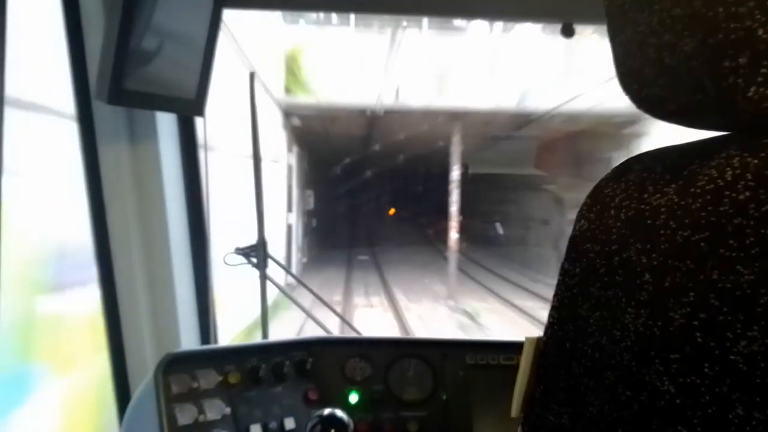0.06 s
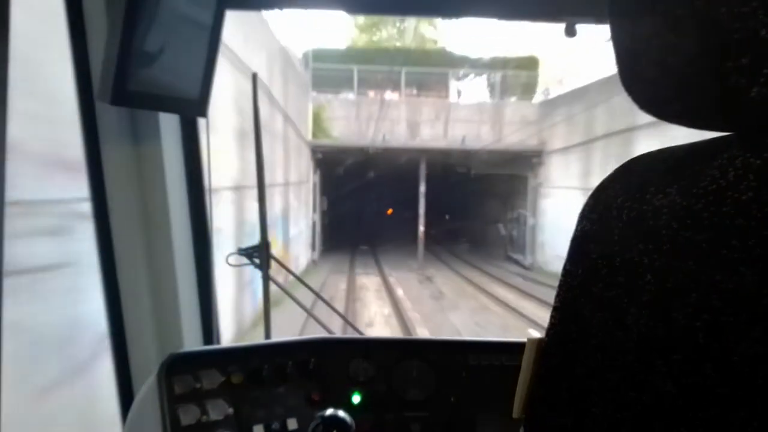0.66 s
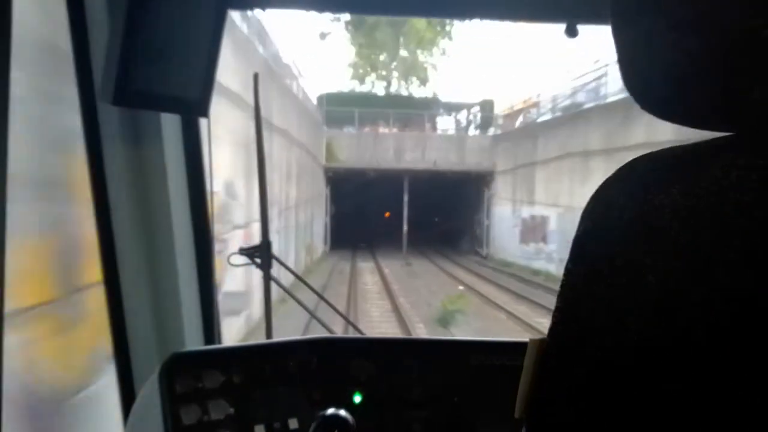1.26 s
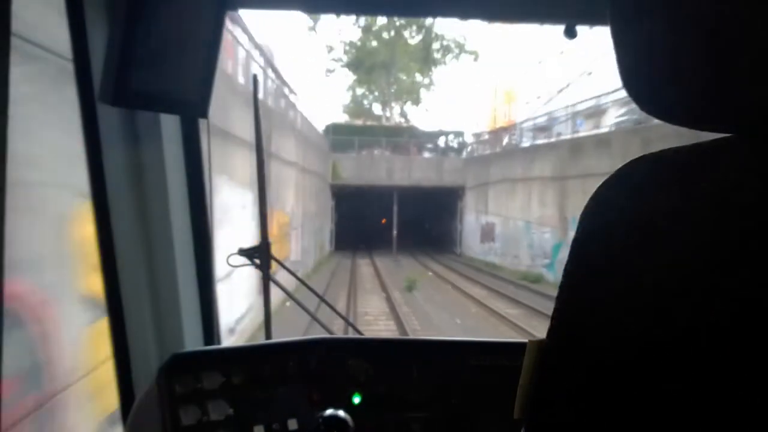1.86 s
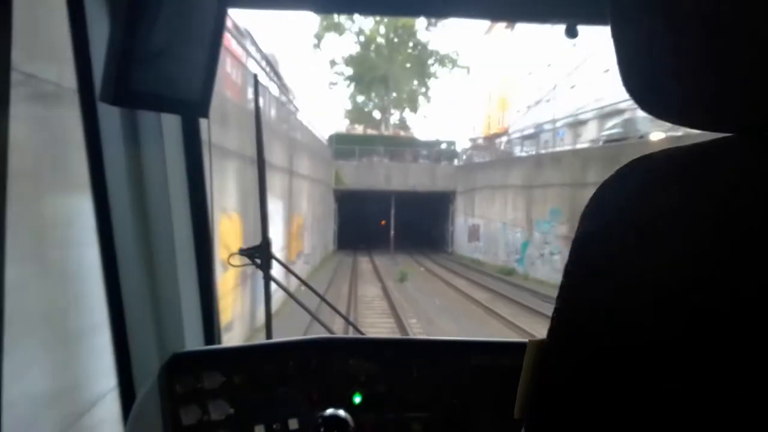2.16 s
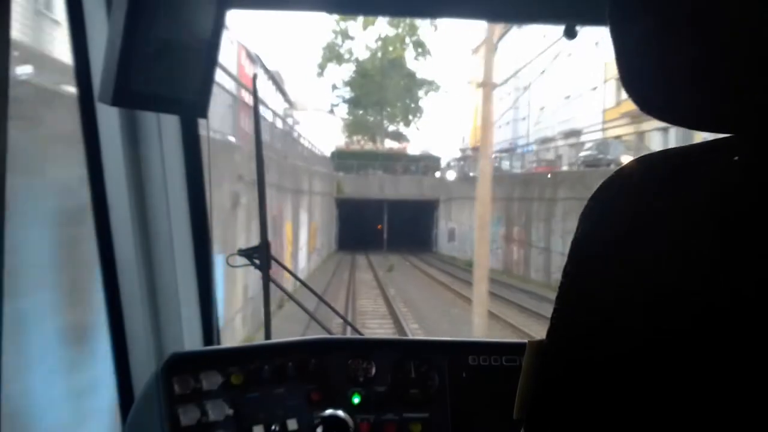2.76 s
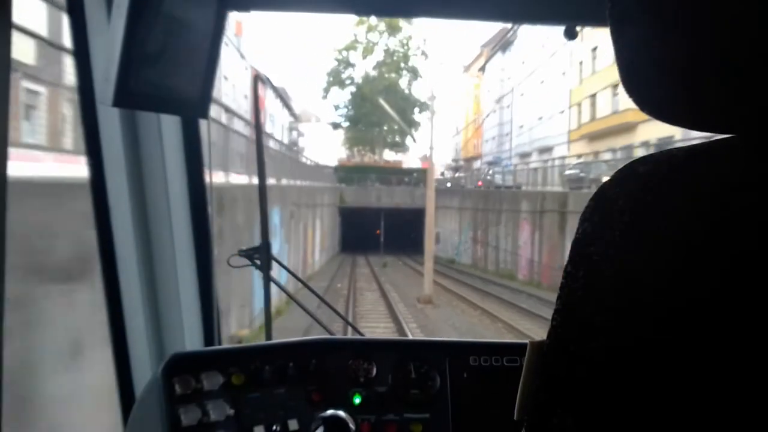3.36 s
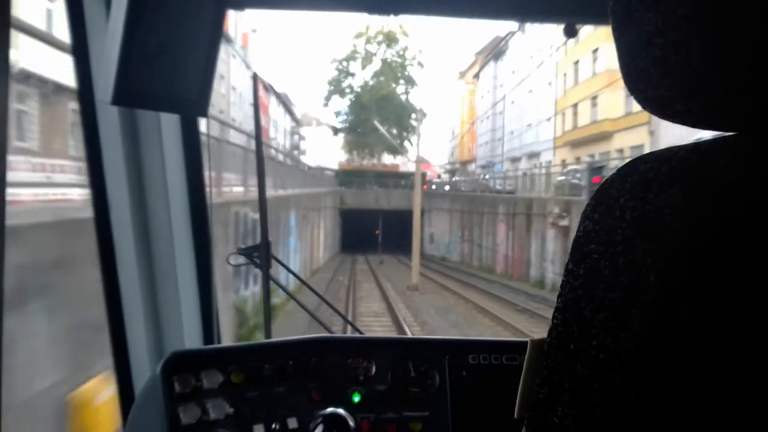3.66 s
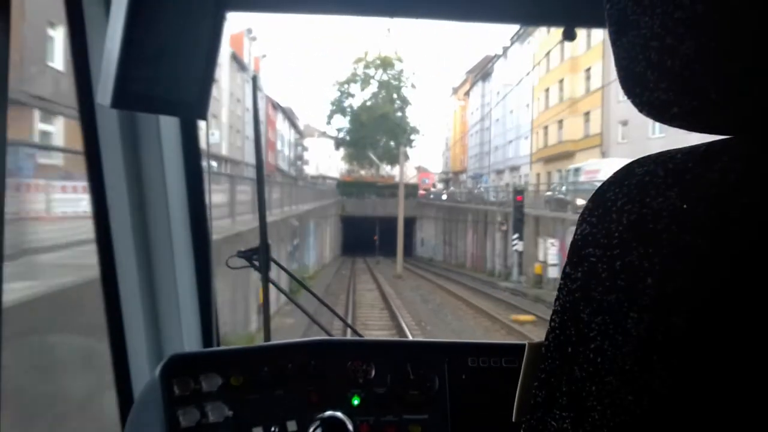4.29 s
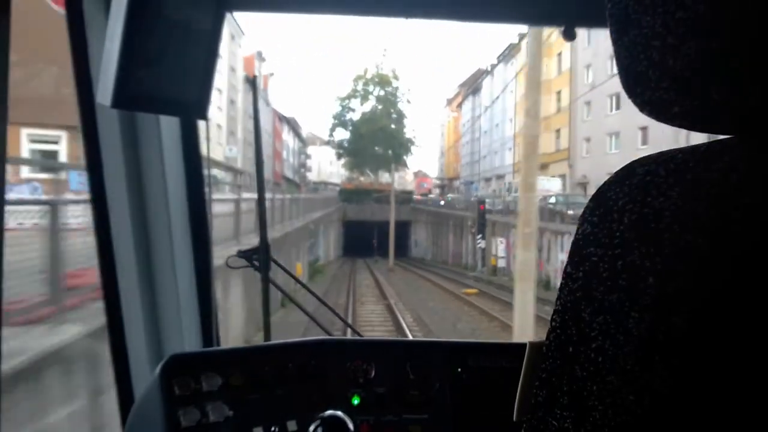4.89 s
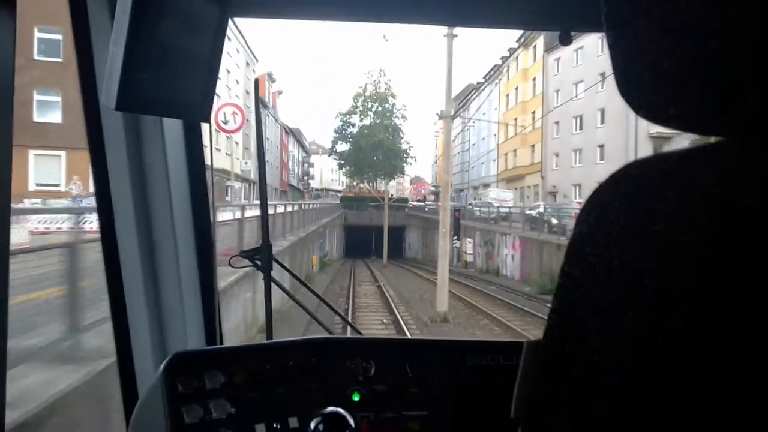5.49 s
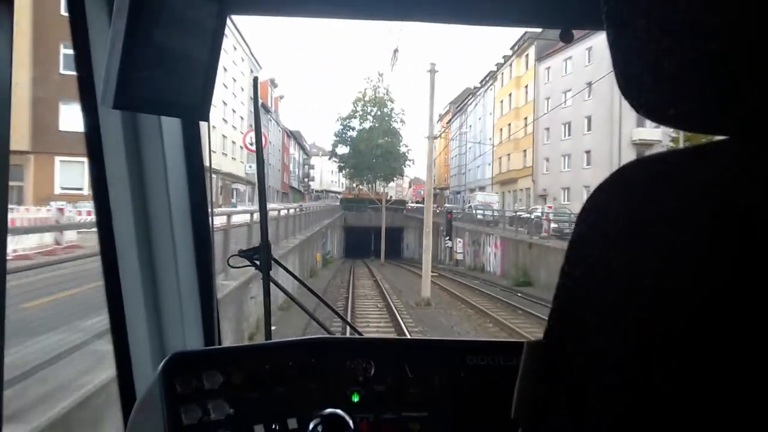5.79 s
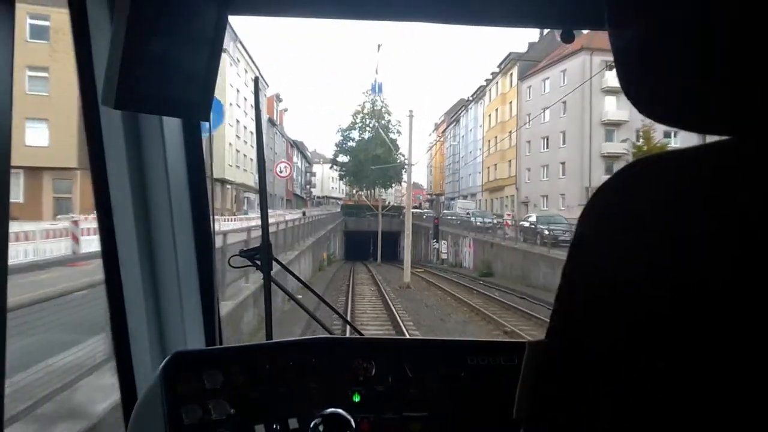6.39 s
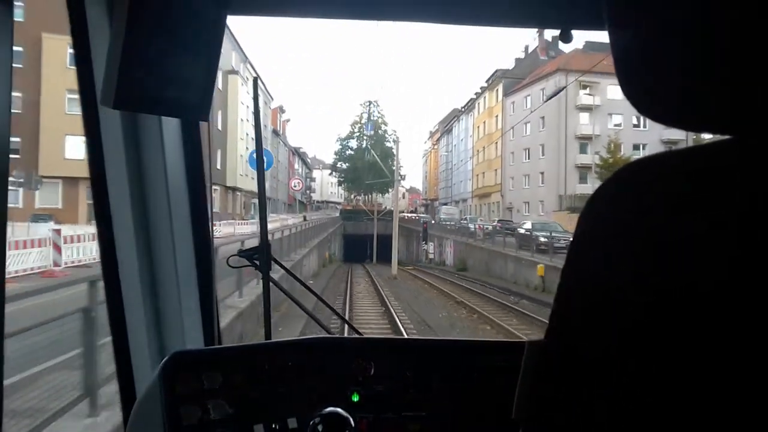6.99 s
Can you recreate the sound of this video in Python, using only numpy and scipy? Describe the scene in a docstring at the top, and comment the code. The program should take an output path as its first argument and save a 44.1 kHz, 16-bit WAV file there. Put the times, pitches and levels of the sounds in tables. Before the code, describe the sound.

Heard from inside the rear cab, a tram climbs out of a tunnel with a steady low drone, floor rumble and rolling wheel roar. The rails sing a high, continuous tone above it. Loose fittings click and squeak around the first second, then give only faint, scattered chirps. From about halfway, the roar reflected by the concrete walls thins and the ride gets a little quieter as the tram slows slightly.

```python
"""A tram's body booms and drones, heard from the rear cab as it climbs a concrete ramp out of a tunnel,
slowing a little. Wheel and rail roughness shake the floor and panels; the bogie roars, the rails sing
near 1.3 kHz, and the walls throw back a roar that thins as they fall away. Loose cab fittings click,
chirp, squeal and rasp on top, over a faint bed of air hiss and converter whine."""
import sys
import numpy as np
from scipy import signal
from scipy.fft import rfft, irfft
from scipy.io import wavfile
from scipy.ndimage import uniform_filter1d, map_coordinates

SR = 44100
rng = np.random.default_rng(int(sys.argv[2]) if len(sys.argv) > 2 else 0)


def file_out(sig):
    """Save sig as 16-bit WAV at sys.argv[1]."""
    # one column per channel
    cols = np.atleast_2d(sig).T
    # limit, then scale
    lim = np.clip(cols, -1, 1)
    pcm = np.round(lim * 32767).astype(np.int16)
    wavfile.write(sys.argv[1], SR, pcm)


N = 319725
TIME = np.arange(N) / SR
FREQ = np.maximum(np.arange(N // 2 + 1) * SR / N, 1)

# wheel motion: (time [s], speed [turns/s], weight of the drone's repeating part [0-1])
WHEEL_MOTION = [(0, 7.68, 0.61), (.6, 7.4, 1), (1.2, 6.37, 0), (2.2, 6.98, 0.4), (3.2, 6.4, 0.44),
                (5, 5.86, 0.19), (7.25, 5.64, 0.2)]
# polygon wear of the treads: (waves per turn [count], relative level [dB])
TREAD_WEAR = [(35, 0), (40, -1), (45, -3), (53, -11)]
# rough stretches of rail: (centre time [s], drone lift [dB], roar lift [dB])
ROUGH_STRETCHES = [(.38, 2.1, .5), (1.11, 2, 2), (2.52, 2, 1), (3.28, 3.5, 0.5), (5.86, 0, 2.5),
                   (6.33, 1.8, 1)]
# resonances of panels, floor, concrete trough, bogie and rails: (frequency [Hz], width [Hz], gain [dB])
PANEL_MODES = [(191.6, 12, -21), (209.4, 32.4, -17.5), (253, 20.4, 0.5), (284, 29.4, 1), (316.7, 24.5, -1),
               (335, 31, -1), (380.1, 12.3, -2), (403.6, 32, -5)]
FLOOR_MODES = [(72.7, 11.3, -6.5), (83.5, 5.6, -0.5), (100, 15.6, -6), (125.2, 9.9, -8.5),
               (135.9, 10.6, -7.5)]
TROUGH_MODES = [(253.4, 22.6, 0.5), (289.5, 22, 0)]
BOGIE_MODES = [(450, 26, 1), (494.7, 20.6, 4), (561.5, 70, -2), (615, 61, 0), (694, 42, -2.5),
               (727.5, 45, -3.5), (799, 79, -5.5), (903, 45, -7), (992, 41, -7.5)]
RAIL_MODES = [(1306.5, 85, -4.5), (1328.3, 26, 0), (1363, 38, -2), (1406, 42, -5), (1438.7, 53, -4.5),
              (1485, 60, -11.5), (1543, 78, -20)]
# fader rides for floor boom, bogie roar, rail song, wall roar and air hiss: (time [s], level [dB])
BOOM_FADER = [(0, -44), (1.45, -44), (1.9, -39.5), (2.5, -39.5), (3.0, -41.5), (3.4, -46.5), (4, -43),
              (4.9, -42.5), (6, -43), (7.25, -45)]
ROAR_FADER = [(0, -35.5), (1.3, -35), (2.1, -37), (2.6, -34), (3.2, -34.5), (3.9, -33), (4.7, -36),
              (5.9, -36.5), (6.6, -36), (7.25, -37)]
SONG_FADER = [(0, -32), (.5, -29.5), (1.5, -30), (2.15, -32.5), (2.7, -31.5), (3.2, -31.5), (3.7, -35.5),
              (4.15, -32), (4.6, -35.5), (6.6, -36.5), (7.25, -33.5)]
WALL_FADER = [(0, -33.5), (1.6, -35), (3.1, -35.5), (3.5, -38.5), (4.1, -37.5), (4.6, -46), (5.0, -48.5),
              (5.25, -41), (5.62, -56), (5.95, -45), (6.4, -43.5), (7.25, -59)]
AIR_FADER = [(0, -68), (1.1, -66.5), (1.7, -68.5), (3.3, -69.5), (4.9, -71), (6.6, -69), (7.25, -70.5)]
# EQ for rumble, wall roar, rolling hiss, fitting noise and air hiss: (frequency [Hz], gain [dB])
RUMBLE_EQ = [(15, -18), (35, -20), (52, -5), (70, 2.5), (140, -6), (162, -14.5), (200, -11.5), (400, -30)]
WALL_EQ = [(400, -40), (700, 2.5), (900, 1), (1050, 2), (1130, 2), (1190, 5.5), (1250, 11.5), (1320, 3),
           (1500, -6.5), (1600, -9), (1700, -41), (2000, -46)]
HISS_EQ = [(1200, -13), (1650, 8), (1850, 1), (2200, -1.5), (2470, 2.5), (2750, -0.5), (3150, 0),
           (3450, -6), (3800, -17), (5000, -32)]
FITTING_EQ = [(2000, -23), (4200, -13), (6000, -13), (7500, -7.5), (9300, -3), (10800, -3), (13000, -1),
              (14500, -7.5), (16000, -17.5)]
AIR_EQ = [(2500, -18.5), (3800, 1.5), (5900, 1.5), (6400, -2.5), (8200, -2), (10000, -2.5), (12500, -1.5),
          (14000, -6), (15700, -16.5)]
# knocks of a loose fitting: (time [s], relative level [dB], decay [s], treble tilt [dB/octave])
CLICK_CUES = [(.466, -58, 0.0055, -4), (.733, -39.5, 0.0087, -1), (.819, -40, .007, 5),
              (0.92, -54, 0.014, -9), (1.021, -50, .012, -1), (1.657, -63, .005, 4),
              (2.157, -61, 0.0059, 6), (2.48, -60, .006, -7), (3.954, -64, 0.0079, 9),
              (4.096, -48, .004, -1), (5.119, -67, .008, 6), (5.855, -57, .004, 3), (6.181, -53, 0.019, 0)]
# ring of the metal fitting: (frequency [Hz], gain [dB], t60 [s])
FITTING_MODES = [(6450, -11, .06), (8200, -10, .07), (9500, -3, .06), (10300, -14, .4), (11100, -8, .12),
                 (11510, -5, .1), (12500, -8, .14), (12860, -11, .16), (13550, -11, .07), (14900, -13, .08)]
# single slips of a dry joint: (time [s], relative level [dB], pitch [Hz])
CHIRP_CUES = [(.335, -64, 11300), (.692, -59, 10700), (1.028, -44, 10400), (1.184, -51, 10490),
              (1.252, -56, 10600), (1.315, -58, 10300), (2.41, -55.5, 11100), (2.846, -63, 11500),
              (4.21, -55, 11400), (4.46, -56, 11300), (4.484, -52, 11400), (4.876, -61, 11460),
              (5.264, -58, 11500), (5.322, -62, 11480), (5.37, -60, 11400), (5.887, -57, 11300),
              (5.918, -57, 11200), (6.002, -59, 11100), (6.11, -64, 11400), (6.596, -54, 11400),
              (6.98, -56, 9400), (6.984, -59, 10900), (7.057, -61, 11400)]
# longer rubs of the joint: (centre time [s], relative level [dB], half length [s], squeal send [dB])
RUB_CUES = [(.1, -65, .03, -10), (.98, -68, .25, -7), (1.05, -47, 0.017, -8), (1.069, -52.5, .01, 4.5),
            (1.283, -58, 0.021, -15), (2.25, -56.5, 0.035, -11), (2.336, -59, 0.041, -18),
            (2.737, -62, 0.029, -9), (3.16, -67.5, .03, -9), (3.684, -66, .025, -10),
            (4.01, -69, 0.041, -7), (4.125, -68, .02, -7), (6.305, -61, .032, -12)]
# soft rubs of a panel: (centre time [s], half length [s], level [dB])
RASP_CUES = [(1.05, .05, -59.5), (1.92, .07, -62.5), (3.2, .07, -66), (6.72, .08, -62)]
# resonances of the joint and of the rubbing panel: (frequency [Hz], width [Hz], gain [dB])
JOINT_MODES = [(10400, 110, -9.5), (11020, 170, 3), (11340, 220, -2.5), (12400, 150, -13)]
RASP_RESONANCES = [(2010, 230, -2), (2752, 450, 0), (5000, 350, -12), (5557, 450, -16)]
# converter tones: (frequency [Hz], level [dB])
WHINE_TONES = [(4000, -88), (9200, -88.5), (10000, -96)]


def body_drone(sway_db=.6, trough_db=2):
    """Rolling shakes the panels into a drone; the concrete trough and worn treads add their tones."""
    share = curves(WHEEL_MOTION)[1]
    drone_lift_db, _ = rough_rail()
    shake = running(open_db=-29, walls_db=1.13, doubling_db=3.6) * undb(drone_lift_db + sway_db * walk(9))
    panels = rolling(PANEL_MODES, 1.15 * share)
    trough = rolling(TROUGH_MODES, share) * fader(WALL_FADER, trough_db)
    return shake * steady(panels + (trough + wear_chord()) / shake, .15)


def wear_chord(level_db=-34, hold_s=2.43, fade_db_per_s=15.5):
    """Polygon wear sings a wavering chord that follows wheel speed, holds, then dies away."""
    phase = 2 * np.pi * wheel_turns()
    chord = sum(undb(db + 1.9 * walk(7)) * np.sin(waves * phase + .72 * walk(5.97))
                for waves, db in TREAD_WEAR)
    return unit(chord) * undb(level_db - fade_db_per_s * np.maximum(TIME - hold_s, 0))


def floor_boom(order=13, hum_hz=86.1, hum_width_hz=3, hum_db=1, rumble_db=-55.5):
    """The floor booms over a low rumble, and hums as one wheel order slides through its resonance."""
    order_hz = order * curves(WHEEL_MOTION)[0]
    tone = np.sqrt(2) * np.sin(2 * np.pi * order * wheel_turns() + .5 * walk(3.6))
    hum = tone / (1 + ((order_hz - hum_hz) / hum_width_hz) ** 2)
    boom = steady(rolling(FLOOR_MODES, share=.33) + undb(hum_db) * hum, .14)
    return boom * fader(BOOM_FADER, .54 * walk(9)) + eq_noise(RUMBLE_EQ) * undb(rumble_db)


def rail_song():
    """The rails ring in a narrow band, their modes swelling in turn as the contact point wanders."""
    song = sum(undb(db + 1.7 * walk(6)) * np.sqrt(width) * band(hz, width) for hz, width, db in RAIL_MODES)
    return steady(song, .24) * fader(SONG_FADER, .47 * walk(8) + .71 * walk(30))


def bogie_roar():
    """Rolling drives the bogie into a midrange roar that lifts on rough rail."""
    _, roar_lift_db = rough_rail()
    roar = steady(rolling(BOGIE_MODES, share=.15), .27)
    return roar * fader(ROAR_FADER, roar_lift_db + .8 * walk(8))


def wall_roar():
    """The walls throw back a wash of rolling noise that thins as they fall away."""
    return eq_noise(WALL_EQ) * fader(WALL_FADER)


def rolling_hiss():
    """Wheels on rails put a light, fluttering hiss above the roar."""
    return eq_noise(HISS_EQ) * running(open_db=-60, walls_db=1.9, doubling_db=2.2) * undb(.51 * walk(15))


def clicks(trim_db=-2.5, ring_db=-8, attack_s=.00084):
    """Each knock is a bright crack, then the fitting rings on, a little differently every time."""
    out = np.zeros(N)
    spectrum = rfft(noise()) * colour(FITTING_EQ)
    octaves = np.log2(np.maximum(FREQ, 2000) / 10000)
    hz, mode_db, t60 = np.transpose(FITTING_MODES)[:, :, None]
    for s, db, decay, tilt_db in CLICK_CUES:
        near = (TIME > s) & (TIME < s + .5)
        age = TIME[near] - s
        crack = unit(irfft(spectrum * undb(tilt_db * octaves), N))[near] * np.exp(-age / decay)
        strength, detune = rng.standard_normal((2, len(hz), 1))
        envelopes = undb(mode_db + 2 * strength + tilt_db * np.log2(hz / 10000) - 60 * age / t60)
        ring = (envelopes * np.sin(2 * np.pi * hz * (1 + .001 * detune) * age)).sum(0)
        attack = 1 - np.exp(-age / attack_s)
        out[near] += undb(db + trim_db) * attack * (crack + undb(ring_db) * ring)
    return out


def chirps(trim_db=-5.5, half_s=.0039, lower_hz=8270, lower_db=-8, spray_db=-9):
    """A single slip rings two rough modes of a joint for a moment, with a little spray of hiss."""
    out = np.zeros(N)
    roughness = band(0, width_hz=850)
    lower = undb(lower_db) * band(lower_hz, width_hz=350)
    spray = undb(spray_db) * eq_noise(FITTING_EQ)
    for s, db, hz in CHIRP_CUES:
        upper = roughness * np.sin(2 * np.pi * hz * (TIME - s))
        out += undb(db + trim_db) * swell(s, half_s) * (upper + lower + spray)
    return out


def rubs(trim_db=-4.5, squeal_lift_db=1):
    """Stick and slip: a grainy scrape that may catch the joint's modes and squeal."""
    grain = undb(2.8 * walk(350))
    scrape = unit(grain * eq_noise(FITTING_EQ))
    squeal = undb(squeal_lift_db) * steady(shaped(noise(), resonances(JOINT_MODES)), .02)
    return sum(undb(db + trim_db) * swell(s, half_s) * (scrape + undb(send_db) * squeal)
               for s, db, half_s, send_db in RUB_CUES)


def rasps():
    """A rubbing panel gives short, soft rasps in the upper mids."""
    scrape = shaped(noise(), resonances(RASP_RESONANCES)) * undb(1.5 * walk(60))
    return scrape * sum(undb(db) * swell(s, half_s) for s, half_s, db in RASP_CUES)


def air_hiss():
    """A faint bed of bright air."""
    return eq_noise(AIR_EQ) * fader(AIR_FADER, .45 * walk(13))


def converter_whine():
    """The converters hold thin, slightly wavering tones."""
    return sum(np.sqrt(2) * undb(db + 1.4 * walk(4)) * np.sin(2 * np.pi * hz * TIME + .3 * walk(12))
               for hz, db in WHINE_TONES)


def cab_reverb(x, t60=.4, wet_db=-8, predelay_s=.004):
    """The small glazed cab adds a short tail."""
    tail = noise() * undb(-60 * TIME / t60) * (TIME > predelay_s)
    return x + undb(wet_db) * signal.fftconvolve(x, tail / np.sqrt(np.sum(tail ** 2)))[:N]


def rolling(modes, share, points=1024):
    """Resonances driven by the tread, which loops every turn (share of power), and by fresh rail."""
    gain, share = resonances(modes), np.clip(share, 0, 1)
    contact = wheel_turns() % 1 * points
    tread = map_coordinates(rng.standard_normal(points), [contact], order=3, mode="grid-wrap")
    return np.sqrt(share) * shaped(tread, gain) + np.sqrt(1 - share) * shaped(noise(), gain)


def running(open_db, walls_db, doubling_db, walls_sink_s=(3.03, 4.1)):
    """Gain: open_db in the open at final speed, lifted by the walls and per doubling of speed."""
    speed = curves(WHEEL_MOTION)[0]
    enclosed = np.interp(TIME, walls_sink_s, [1, 0])
    return undb(open_db + walls_db * enclosed + doubling_db * np.log2(speed / speed[-1]))


def rough_rail(half_s=.072):
    """Extra dB of drone and of roar while the wheels cross rough stretches."""
    return sum(np.outer(lifts_db, swell(s, half_s)) for s, *lifts_db in ROUGH_STRETCHES)


def wheel_turns():
    """Turns made by the wheels so far."""
    return np.cumsum(curves(WHEEL_MOTION)[0]) / SR


def undb(db):
    """Decibels to gain."""
    return 10 ** (np.asarray(db) / 20)


def unit(x):
    """Scale to rms 1."""
    return x / np.sqrt(np.mean(x ** 2))


def curves(table):
    """Each column after time as a value per sample."""
    s, *columns = np.transpose(table)
    return [np.interp(TIME, s, c) for c in columns]


def fader(table, offset_db=0):
    """Gain per sample from a fader ride plus an offset."""
    return undb(curves(table)[0] + offset_db)


def swell(centre_s, half_s):
    """Bell-shaped envelope."""
    return np.exp(-((TIME - centre_s) / half_s) ** 2)


def noise():
    """White noise."""
    return rng.standard_normal(N)


def shaped(x, gain):
    """Filter by a gain per frequency, then scale to rms 1."""
    return unit(irfft(rfft(x) * gain, N))


def colour(points):
    """Gain per frequency from an EQ curve, rolling off above its last point."""
    hz, db = np.transpose(points)
    return undb(np.interp(np.log(FREQ), np.log(hz), db)) * np.minimum(hz[-1] / FREQ, 1) ** 2


def resonances(modes):
    """Gain per frequency of a set of steep-sided resonances."""
    return np.sqrt(sum(undb(db) ** 2 / (1 + ((FREQ - hz) / width) ** 2) ** 4 for hz, width, db in modes))


def eq_noise(points):
    """Noise through an EQ curve, at rms 1."""
    return shaped(noise(), colour(points))


def band(hz, width_hz):
    """Noise through one resonance, at rms 1."""
    return shaped(noise(), resonances([(hz, width_hz, 0)]))


def steady(x, seconds):
    """Hold the slow level at 1 and keep the quick flutter."""
    return x / np.sqrt(uniform_filter1d(x ** 2, max(int(seconds * SR), 1)) + 1e-18)


def walk(rate_hz):
    """Smooth random modulation at rms 1: sample and hold, slewed twice."""
    hold = int(SR / rate_hz)
    steps = np.repeat(rng.standard_normal(N // hold + 1), hold)
    return unit(uniform_filter1d(uniform_filter1d(steps, hold), hold)[:N])


def scene():
    """Mono mix: running noise, close fittings in the cab's reverb, and the faint bed."""
    ride = body_drone() + floor_boom() + rail_song() + bogie_roar() + wall_roar() + rolling_hiss()
    fittings = cab_reverb(clicks() + chirps() + rubs() + rasps())
    return (ride + fittings + air_hiss() + converter_whine())[None]


def record(dry, port_hz=11350, port_width_hz=650, port_db=8.5, top_hz=15600):
    """The microphone port rings in the high treble; the top is cut."""
    ring = signal.lfilter(*signal.iirpeak(port_hz, port_hz / port_width_hz, fs=SR), dry)
    high_cut = signal.ellip(10, .1, 80, top_hz, fs=SR, output="sos")
    return signal.sosfilt(high_cut, dry + (undb(port_db) - 1) * ring)


dry = scene()
out = record(dry)
file_out(out)
```